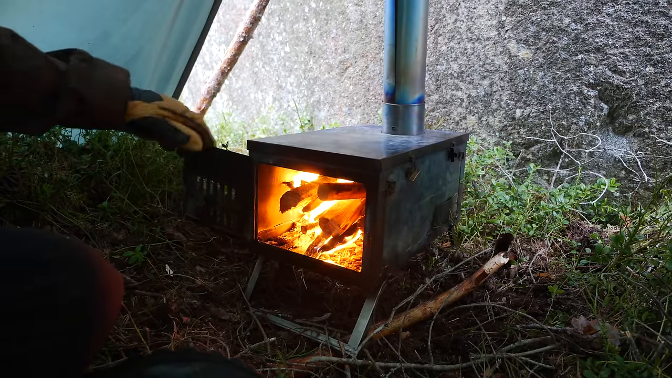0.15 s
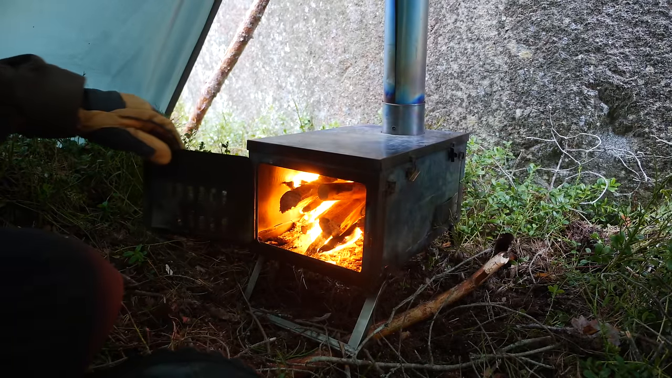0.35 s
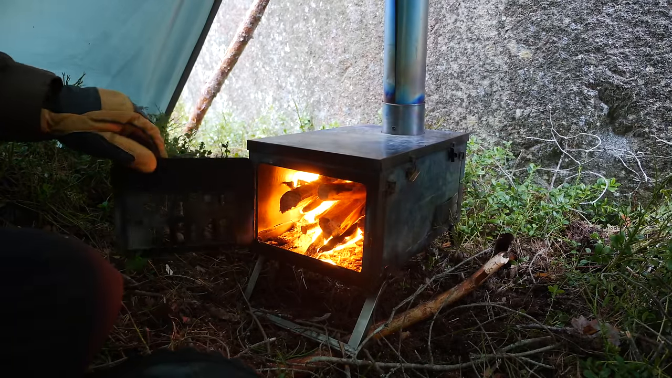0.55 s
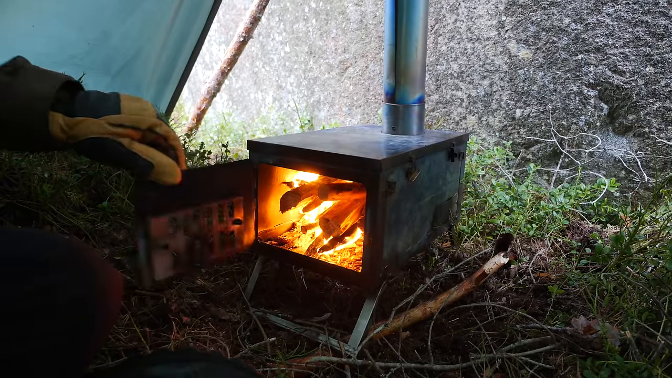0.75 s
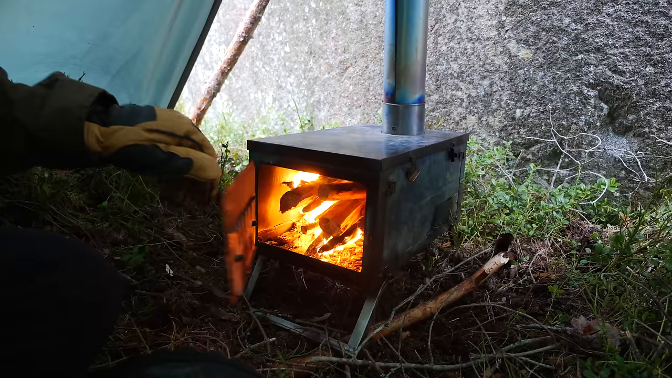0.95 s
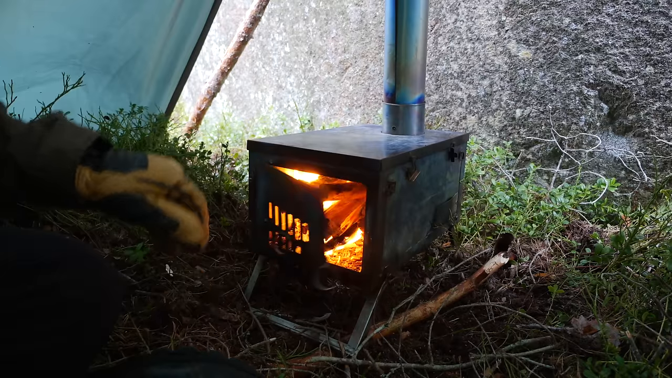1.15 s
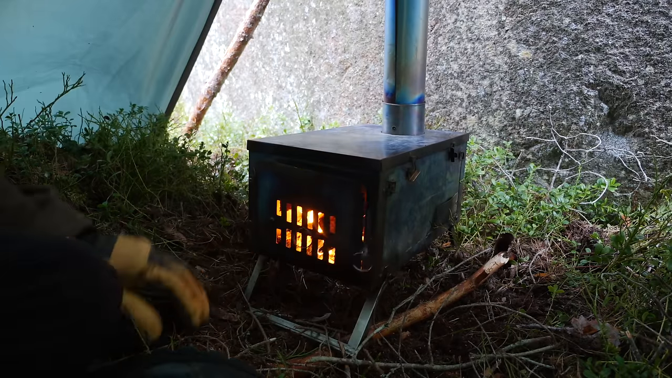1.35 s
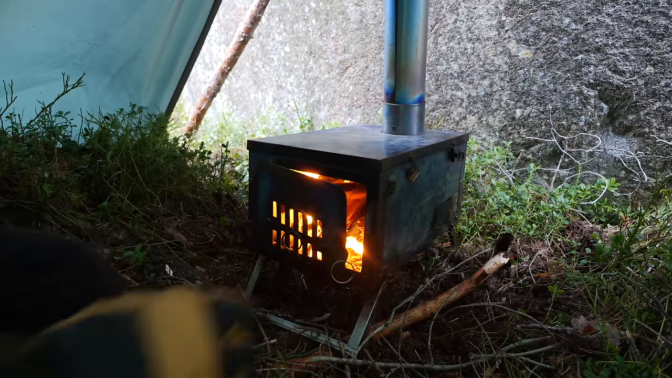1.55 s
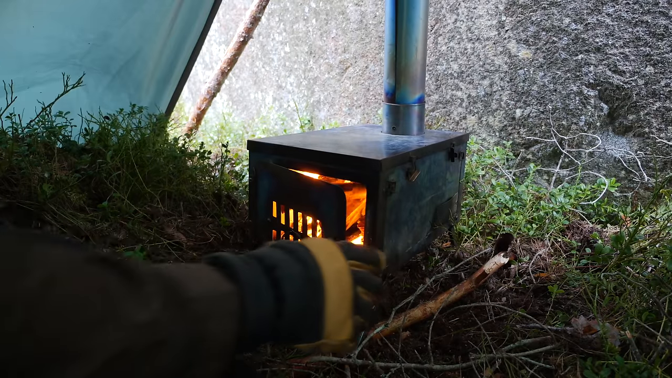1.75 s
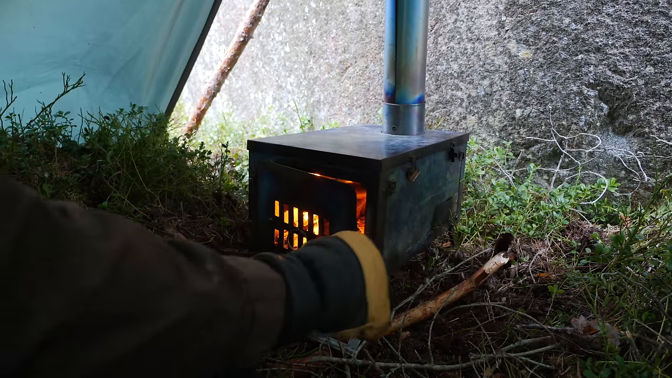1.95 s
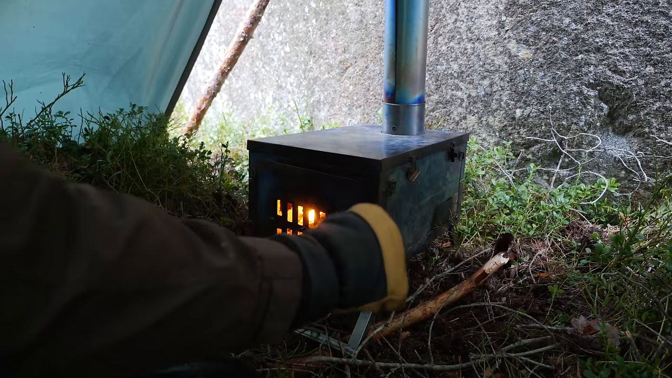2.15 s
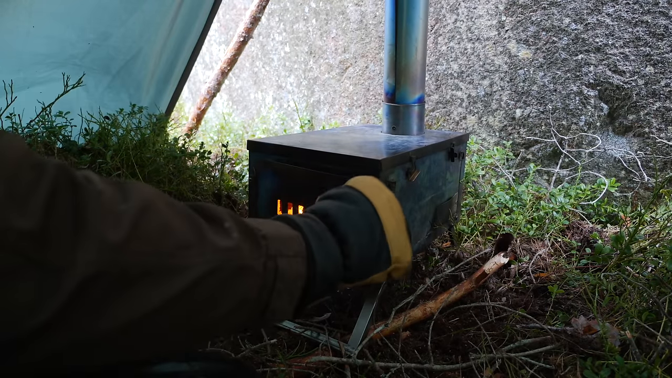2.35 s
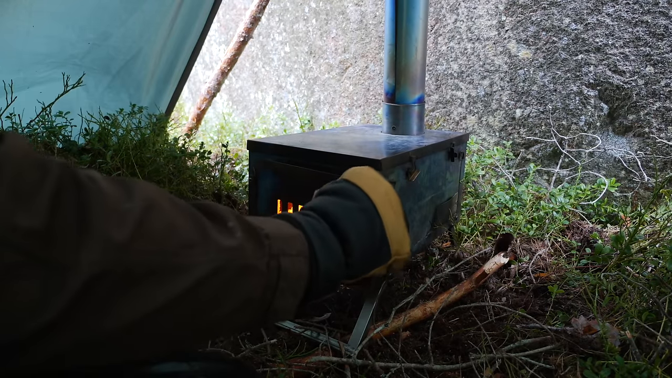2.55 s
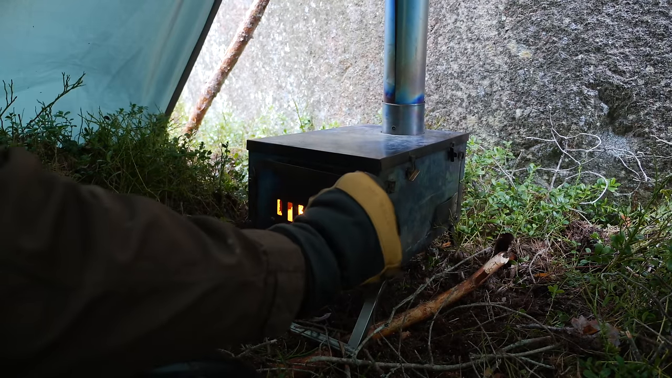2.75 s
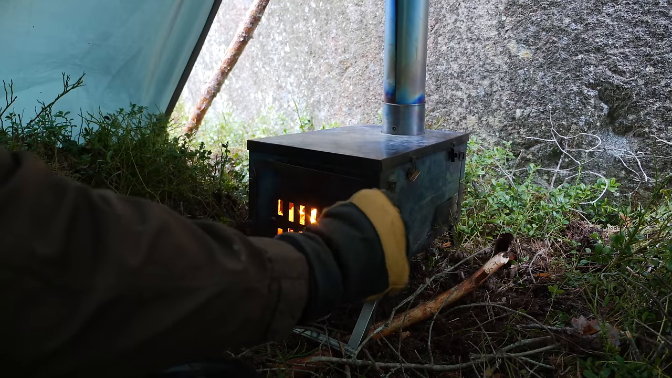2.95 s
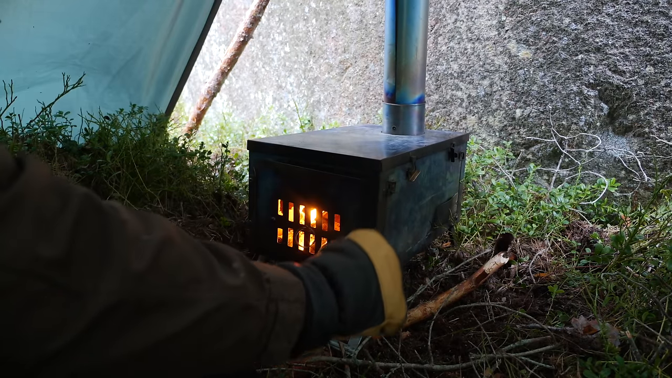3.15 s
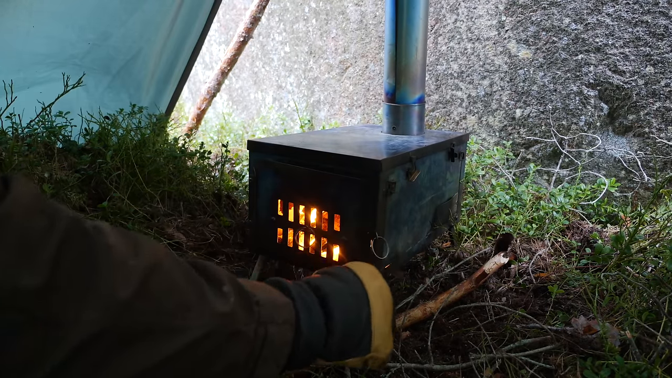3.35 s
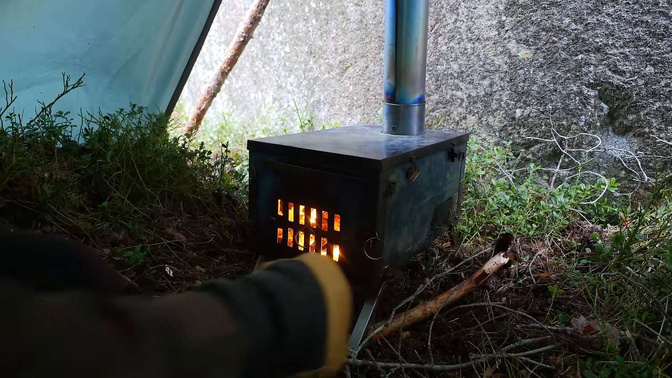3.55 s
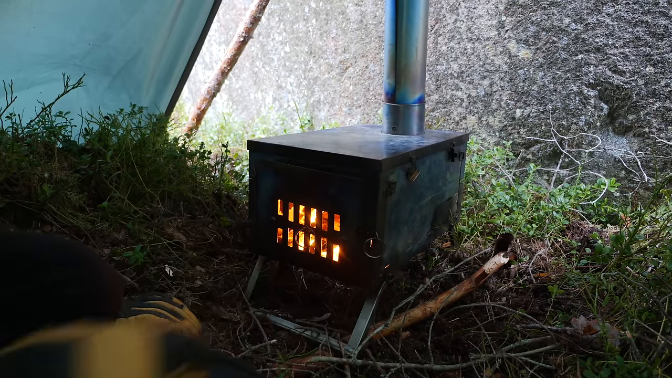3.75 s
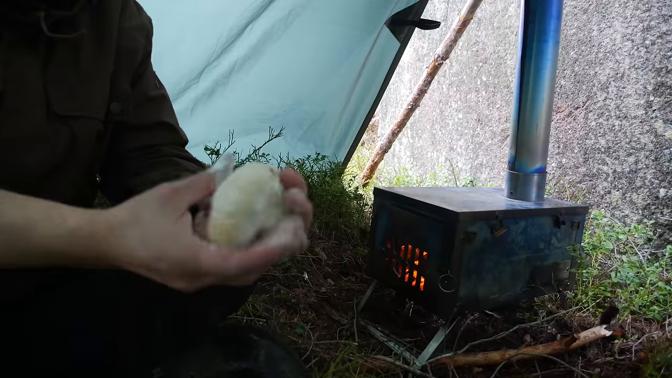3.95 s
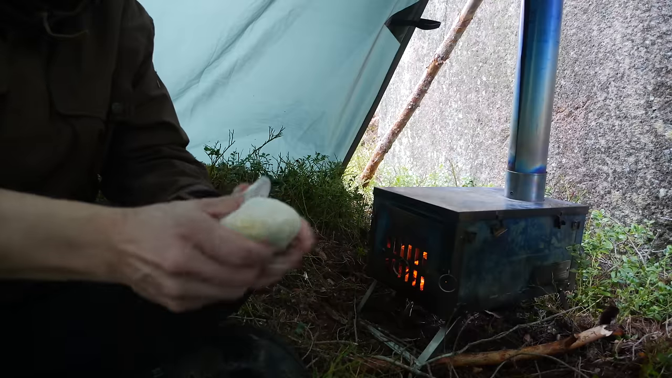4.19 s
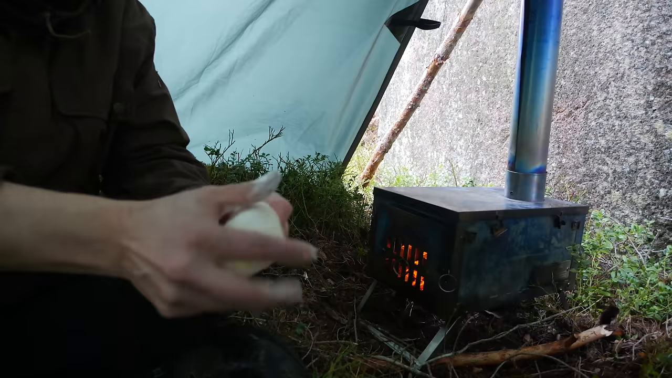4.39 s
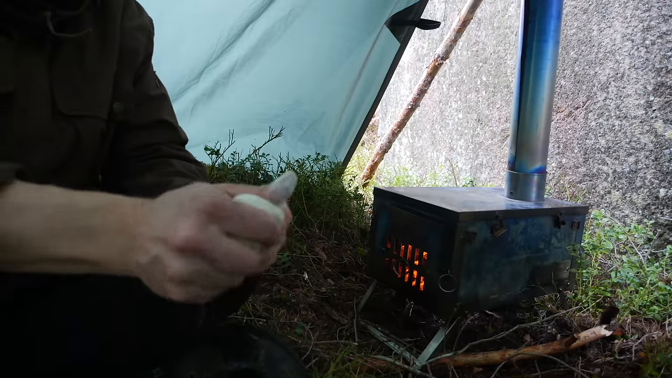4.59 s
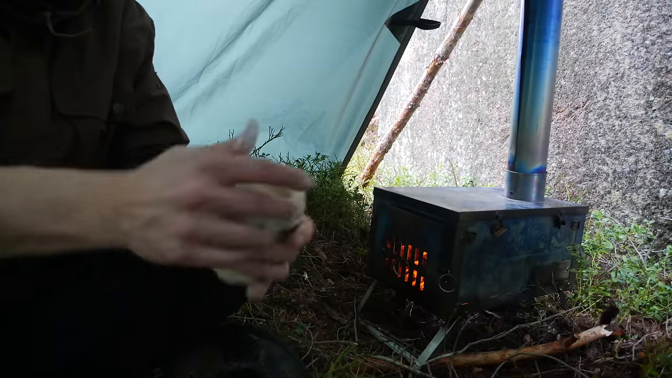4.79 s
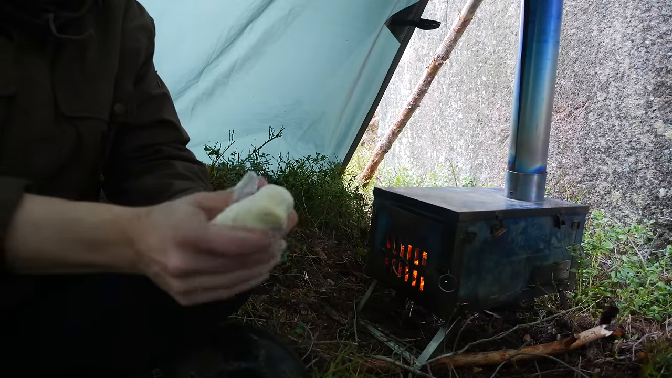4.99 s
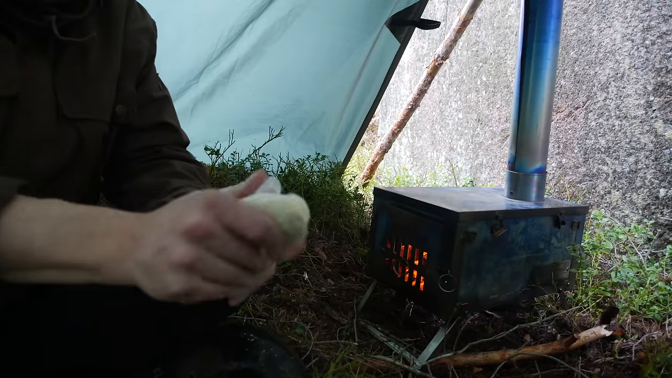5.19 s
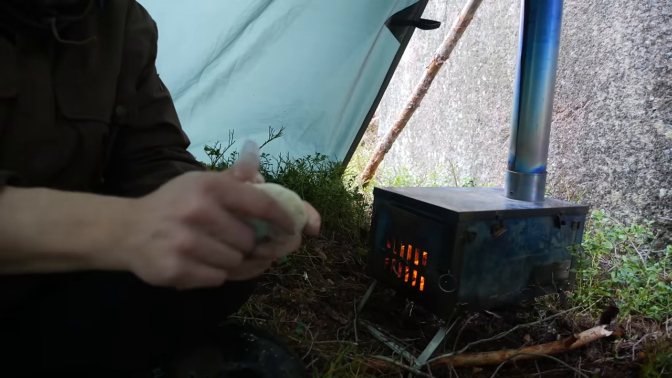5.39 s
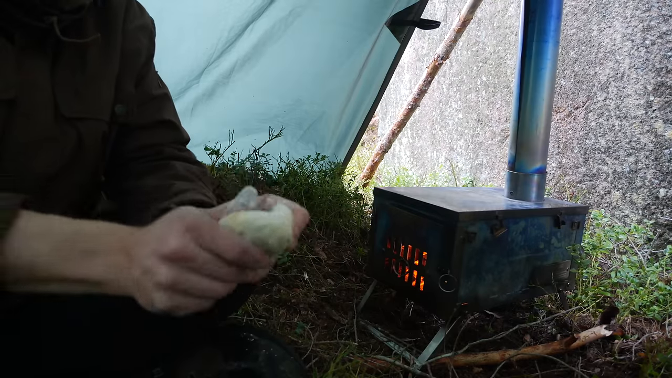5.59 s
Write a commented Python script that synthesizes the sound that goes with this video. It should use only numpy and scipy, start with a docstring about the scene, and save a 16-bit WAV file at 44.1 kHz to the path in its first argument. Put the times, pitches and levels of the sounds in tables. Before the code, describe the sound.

Thin sheet metal is handled first: small knocks, sleeve rustle, dragging hinge and tiny high squeaks. One hard, bright slam stands out far above the rest, ringing briefly. The latch then rattles, scrapes and knocks into place. After that only soft, uneven skin rubs on dough remain, with a faint fire and microphone hiss, close, mono and dry.

```python
"""Tent stove door, then dough

At a small tent stove a gloved hand swings the thin steel door shut and works its latch; later bare hands
knead dough. Blows ring decaying modes of sheet, door and latch; the drag is random slips waking modes, over
noise; rough single resonances are narrow noise; squeaks are wavering tones. Sleeve, hands and fire are coloured,
moving noise, snaps short noise bursts. One microphone in its housing, mono, with its own hiss, no room echo."""
import sys
import numpy as np
from scipy import signal
from scipy.fft import rfft, irfft
from scipy.io import wavfile
from scipy.ndimage import uniform_filter1d

SR = 44100
rng = np.random.default_rng(int(sys.argv[2]) if len(sys.argv) > 2 else 0)


def unload_wav(signal):
    """Save mono or channel-first audio to the path in sys.argv[1] as 16-bit WAV at rate SR, clipped to [-1, 1]."""
    wavfile.write(
        sys.argv[1],
        SR,
        np.round(np.clip(np.atleast_2d(signal).T, -1, 1) * 32767).astype(np.int16),
    )


def natural_amplitude(level_db):
    """Convert a level in decibels to a linear amplitude factor, elementwise."""
    exponent = np.asarray(level_db, float) / 20
    return 10 ** exponent


N = 248179  # samples

# clear modes of the door: f/Hz, relative level/dB, t60/s before damping
DOOR_MODES = [(163, -7, 0.28), (190, 0, 0.43), (355, -11.5, 0.23), (495, -13, 0.12), (657, -10, 0.18),
              (750, -7, 0.45), (847, -12, 0.3), (980, -20, 0.065), (1031, -16, 0.51), (1067, -18, 0.3),
              (1102, -28, 0.4), (1253, -14, 0.32), (1300, -0.5, 0.26), (1516, -2.5, 0.2),
              (2049, -13.5, 0.16), (2365, -30, 0.18), (2830, -8, 0.27), (3300, 0.5, 0.3), (3500, -9, 0.42),
              (3790, -2, 0.17), (4285, -10, 0.33), (6940, -16, .15), (8250, -5, 0.2)]
# clear modes of the latch bar: f/Hz, relative level/dB, t60/s before damping
LATCH_MODES = [(3600, -26, 0.081), (4710, 0.5, 0.059), (5080, 1.5, 0.046), (5390, -11, 0.25),
               (6700, 7.5, 0.038), (7560, -8, 0.29), (7270, 0, 0.11), (7240, -7, 0.18), (7860, 5, 0.065),
               (12400, -15, .1)]
# crowded modes of the sheet, heard as noise: f/Hz, relative level/dB, t60/s before damping, rise time constant/s
SHEET_BANDS = [(175, -1.5, 0.35, 0.043), (422, 3.5, 0.3, 0.0068), (1000, 4.5, 0.33, 0.0034),
               (1990, -4, 0.38, 0.002), (3880, -4.5, 0.36, 0.00099), (7500, 1, 0.19, 0.00069),
               (13000, -4.5, 0.22, 0.00088)]
# moves of the arm at the stove: peak t/s, rise/s, fall/s, rub of the sleeve level/dB, drag on the door level/dB
ARM_MOVES = [(.17, 0.022, 0.22, -56, -51.5), (.44, 0.025, 0.088, -49, -56),
             (.535, 0.067, 0.1, -40.5, -42.5), (.78, 0.12, 0.069, -59, -50.5),
             (.83, 0.036, 0.15, -48.5, -47.5), (1.146, 0.02, 0.023, -50, -46), (1.29, 0.013, .02, -54, -50),
             (1.23, 0.068, 0.31, -57, -48.5), (1.475, .03, 0.036, -47, -39.5),
             (1.62, 0.16, 0.14, -43.5, -45), (1.77, 0.13, 0.11, -42.5, -44),
             (2.184, 0.023, 0.018, -50.5, -56), (2.27, 0.08, 0.13, -55.5, -45.5),
             (2.345, .06, 0.051, -52.5, -56), (2.42, 0.017, 0.044, -52, -48.5),
             (2.53, 0.048, 0.052, -56, -45), (2.8, 0.022, 0.022, -54, -45), (2.844, .02, 0.02, -49.5, -62),
             (2.96, 0.076, .08, -72, -48.5), (3.088, 0.018, .05, -55, -50), (3.2, 0.043, 0.034, -52, -40),
             (3.29, 0.049, 0.043, -62, -45.5), (3.62, 0.14, 0.58, -51.5, -47), (3.9, 0.32, .2, -50.5, -53)]


def evened(x):
    """Scales to rms 1."""
    return x / np.sqrt(np.mean(x ** 2) + 1e-20)


def smooth_noise(shape, size):
    """Slowly wandering noise of rms 1 along the last axis."""
    return evened(uniform_filter1d(rng.standard_normal(shape), size=size))


def read(points, hz):
    """Reads a spectrum table, straight on a log-frequency axis."""
    f, value = np.transpose(points)
    return np.interp(np.log(hz + 1), np.log(f + 1), value)


def add(mix, s, sound):
    """Mixes a sound in at a time in seconds, in place."""
    part = mix[round(s * SR):][:len(sound)]
    part += sound[:len(part)]


def coloured(x, db):
    """Applies a gain in dB given over the FFT bins, then scales to rms 1."""
    return evened(irfft(rfft(x) * natural_amplitude(db), N))


def noise(points, patchy_db, flicker_db, grain_db):
    """Coloured noise of rms 1 with patches in time and pitch, broad flicker and single fibres catching."""
    catches = np.minimum(rng.exponential(1, N // 16 + 1), 3.5)
    grains = rng.standard_normal(N) * natural_amplitude(grain_db * np.repeat(catches, 16)[:N])
    hz, t, z = signal.stft(grains, SR, nperseg=256)
    field = uniform_filter1d(rng.standard_normal(z.shape), size=5, axis=0)
    patches = evened(uniform_filter1d(field, size=14, axis=1))
    flicker = smooth_noise(len(t), 4)
    moving = z * natural_amplitude(patchy_db * patches + flicker_db * flicker)
    rough = signal.istft(moving, nperseg=256)[1][:N]
    return coloured(rough, read(points, np.fft.rfftfreq(N, 1 / SR)))


def moves(rows, column, rest_db):
    """Gain over time: every move swells and dies by the same law, over a resting level."""
    edge_db = -9.5  # level at the end of the rise or fall, relative to the peak
    pointed = 1.16  # exponent: 1 is peaked, 2 is round
    t = np.arange(0, N, 32) / SR
    power = natural_amplitude(2 * rest_db)
    for row in rows:
        peak_s, rise_s, fall_s = row[:3]
        away = abs(t - peak_s) / np.where(t < peak_s, rise_s, fall_s)
        power = power + natural_amplitude(2 * (row[column] + edge_db * np.minimum(away, 10) ** pointed))
    return np.interp(np.arange(N) / SR, t, np.sqrt(power))


def hiss():
    """Steady hiss of the microphone, a coloured noise with a slight flicker."""
    # hiss spectrum: f/Hz, relative level per Hz/dB
    hiss_spectrum = [(120, -15), (200, -5), (743, 1.5), (2030, -9.5), (5320, -11.5), (6160, -15.5),
                     (8390, -12.5), (15600, -20.5)]
    return natural_amplitude(-59.0) * noise(hiss_spectrum, patchy_db=-2.44, flicker_db=1.5, grain_db=1.5)


def fire():
    """Low rumble of the fire: bass noise that swells and sinks with the draught."""
    # rumble spectrum: f/Hz, relative level per Hz/dB
    rumble = [(15, -32), (25, -3.5), (59, -1), (130, 0), (163, -4), (377, -7.5), (600, -58), (780, -49),
              (1320, -120)]
    # draught of the fire: t/s, level/dB
    draught = [(0.0, -56.5), (0.48, -61), (0.66, -60), (1.1, -61.5), (1.55, -53.5), (1.82, -62),
               (2.13, -59.5), (2.38, -53), (2.84, -58), (3.1, -49), (3.42, -61), (3.82, -54), (4.14, -62),
               (5.25, -59), (5.63, -62.5)]
    t, db = np.transpose(draught)
    gain = natural_amplitude(np.interp(np.arange(N) / SR, t, db))
    return noise(rumble, patchy_db=.8, flicker_db=.8, grain_db=.1) * gain


def bumps():
    """Soft bumps felt low: three slow cycles, most of the swing in the first."""
    # bumps: t/s, relative level/dB, f/Hz
    low_bumps = [(0.527, -35, 125), (2.203, -33.5, 125), (2.823, -38, 124), (3.366, -36, 126),
                 (3.524, -33.5, 125)]
    out = np.zeros(N)
    for s, db, hz in low_bumps:
        cycles = np.arange(round(3 * SR / hz)) * hz / SR
        add(out, s, natural_amplitude(db + 1.5) * np.sin(2 * np.pi * cycles) * np.exp(-cycles / 0.61))
    return out


def snaps():
    """Burning wood and metal edges snap dryly: a brief band of noise, then a faint short tail."""
    # snaps: t/s, peak level/dB, centre f/Hz, spread as a factor each way (at least 1.05 is used)
    dry_snaps = [(.3074, -44, 14000, 1.2), (0.5297, -23, 3450, 1.14), (0.5694, -19.5, 8000, 3.5),
                 (1.1014, -40, 9000, 3), (1.1445, -30.5, 2800, 3.3), (1.148, -33.5, 3300, 1.09),
                 (1.1817, -39, 3500, 1.4), (1.2043, -37, 5000, 1.6), (1.2255, -37, 2000, 2.5),
                 (1.2355, -29.5, 2870, 2), (1.3645, -3.5, 9600, 1.45), (2.181, -26.5, 8200, 1.1),
                 (2.7796, -33, 2530, 1.6), (3.372, -48, 13000, 1.2), (3.398, -49, 6000, 2.2),
                 (3.9868, -27, 10900, 1.5), (4.664, -48, 5400, 1.1), (4.7032, -46, 7800, 1.5),
                 (4.81, -45, 3600, 1.03)]
    t, out = np.arange(1500) / SR, np.zeros(N)
    for s, db, hz, spread in dry_snaps:
        spread = max(spread, 1.05)
        decay = natural_amplitude(-60 * t / 0.0041) + natural_amplitude(-16 - 60 * t / 0.022)
        edges = [hz / spread, min(hz * spread, .4 * SR)]
        band = signal.butter(2, edges, "bandpass", fs=SR, output="sos")
        burst = signal.sosfilt(band, rng.standard_normal(len(t)) * decay)
        add(out, s, natural_amplitude(db) * burst / abs(burst).max())
    return out


def hands():
    """Bare skin rubs on dough: coloured noise that swells with every squeeze."""
    # rub of skin on dough: f/Hz, relative level per Hz/dB
    skin = [(180, -21), (300, -0.5), (652, -8.5), (893, -7.5), (1850, -7.5), (2250, -8), (8460, -5),
            (15600, -15)]
    # squeezes of the dough: peak t/s, rise/s, fall/s, level/dB
    squeezes = [(3.984, 0.035, .1, -50), (4.13, .02, 0.068, -55), (4.2, .02, 0.066, -59.5),
                (4.33, 0.064, 0.055, -56), (4.44, 0.046, 0.018, -47), (4.485, .02, .05, -54.5),
                (4.61, 0.094, .03, -56), (4.67, .02, 0.014, -54.5), (4.71, 0.016, 0.015, -53),
                (4.804, 0.047, 0.062, -50.5), (4.93, 0.028, 0.096, -51), (5.06, 0.086, 0.05, -52),
                (5.145, 0.037, 0.017, -57), (5.2, .03, .05, -56), (5.285, 0.076, 0.027, -48.5),
                (5.52, 0.085, 0.05, -50.5), (5.6, .02, .06, -54)]
    rub = noise(skin, patchy_db=1.5, flicker_db=0.0, grain_db=1.0)
    return rub * moves(squeezes, column=3, rest_db=-74.5)


def sleeve():
    """The jacket rustles: coloured noise that swells with every move of the arm."""
    # rub of cloth: f/Hz, relative level per Hz/dB
    cloth = [(180, -8), (300, -12), (733, -7.5), (954, -16), (1130, -5.5), (1880, -8.5), (8190, -9.5),
             (15600, -24)]
    rustle = noise(cloth, patchy_db=2.5, flicker_db=0.5, grain_db=0.5)
    return rustle * moves(ARM_MOVES, column=3, rest_db=-65.5)


def squeaks():
    """Short stick-slips at a high, wavering pitch with its octave."""
    # squeaks of hinge pin and latch, later of skin on dough:
    # t/s, length/s, f/Hz, relative level/dB, octave level under the tone/dB
    chirps = [(0.917, .04, 6700, -47.5, -10), (.957, 0.029, 8160, -47, -30),
              (0.968, 0.045, 7340, -47.5, -30), (5.264, 0.039, 2210, -58, -30),
              (4.936, 0.052, 4300, -65, -30), (5.003, 0.094, 3960, -62, -30)]
    out = np.zeros(N)
    for s, length, hz, db, octave_db in chirps:
        u = np.linspace(0, 1, round(length * SR))
        pitch_waver, level_waver = smooth_noise((2, len(u)), 45)
        phase = 2 * np.pi * np.cumsum(hz * (1 + .015 * pitch_waver)) / SR
        shape = np.minimum(u / .08, 1) * (1 - u) ** 1.5 * natural_amplitude(3.8 * level_waver)
        octave = natural_amplitude(octave_db) * (2 * hz < .4 * SR) * np.sin(2 * phase)
        add(out, s, natural_amplitude(db + 5.0) * shape * (np.sin(phase) + octave))
    return out


def rough_resonances():
    """Door and latch, after blows or from the dragging hinge: a band that starts fast, breaks up and fades."""
    # rough single resonances: t/s, length/s, f/Hz, level at the start/dB
    resonances = [(.17, 0.19, 190, -50.5), (0.419, 0.082, 3660, -48), (.43, 0.088, 3180, -44),
                  (.55, 0.14, 190, -49.5), (0.722, 0.61, 355, -55), (0.733, 0.071, 1300, -48),
                  (0.857, 0.12, 1031, -47), (1.224, 0.033, 1000, -44.5), (1.245, 0.072, 780, -46),
                  (1.375, 0.088, 190, -44), (1.378, 0.072, 160, -41.5), (1.45, 0.12, 482, -45),
                  (1.447, 0.061, 1031, -39), (1.46, 0.073, 750, -39), (1.582, 0.058, 1300, -41.5),
                  (2.236, .13, 355, -46.5), (2.332, 0.046, 3300, -49), (2.369, 0.15, 355, -52),
                  (2.45, 0.25, 190, -57), (3.1, 0.15, 163, -48), (3.196, 0.24, 355, -51.5),
                  (3.355, .04, 2830, -61), (3.489, 0.043, 5390, -42), (3.568, 0.071, 1300, -48)]
    settle = 2000  # samples for the resonance to build up, then cut off
    out = np.zeros(N)
    for s, length, hz, db in resonances:
        u = np.linspace(0, 1, round(length * SR))
        r = np.exp(-np.pi * (12 + .045 * hz) / SR)  # higher resonances are wider
        real, imaginary = rng.standard_normal((2, len(u) + settle))
        slow = signal.lfilter([1], [1, -r ** 3], real + 1j * imaginary)
        slow = signal.lfilter([1], [1, -r], slow)[settle:]
        slow += 250 / hz * abs(slow).mean()  # low modes hold steadier
        band = evened((slow * np.exp(2j * np.pi * hz * length * u)).real)
        shape = np.minimum(u / .12, 1) * np.minimum((1 - u) / 0.34, 1)
        add(out, s, natural_amplitude(db - 6. * u) * band * shape)
    return out


def drag():
    """Hinge and glove rasp on the sheet; uneven slips wake one mode, then another."""
    # rasp on the sheet: f/Hz, relative level per Hz/dB
    rasp = [(120, -22), (200, -3), (358, 1.5), (557, -2.5), (999, -1), (3210, -9), (6000, -15), (7800, -44),
            (13200, -120)]
    slip_rate = 500.  # mean slips per second
    strength = natural_amplitude(3.9 * np.minimum(rng.exponential(1, N), 2.5))
    slips = (rng.random(N) < slip_rate / SR) * strength * rng.choice([-1, 1], N)
    t, modes = np.arange(SR // 5) / SR, np.zeros(N)
    for hz, _, t60 in DOOR_MODES[3:21] + LATCH_MODES[:4]:
        wander = uniform_filter1d(rng.standard_normal(N), size=2500)
        wander = evened(uniform_filter1d(wander, size=2500))  # the grip moves
        mode = natural_amplitude(-60 * 1.1 * t / t60 - 1.4 * np.log2(hz / 500)) * np.sin(2 * np.pi * hz * t)
        modes += signal.oaconvolve(slips * natural_amplitude(2.7 * np.clip(wander, -2, 2)), mode)[:N]
    shake = natural_amplitude(-9.0) * evened(modes) + noise(rasp, patchy_db=2.1, flicker_db=1.43, grain_db=3.0)
    return evened(shake) * moves(ARM_MOVES, column=4, rest_db=-59.5)


def slope(tilt_db, hz):
    """Tilts the treble about 5 kHz, up for a hard blow and down for a soft one; level below 1.5 kHz."""
    return tilt_db * np.log2(np.maximum(hz, 1500) / 5000)


def ring(modes, t, damping, tilt_db):
    """Clear modes struck at a chance place; bass blooms later than treble."""
    hz, db, t60 = np.transpose(modes)[:, :, None]
    place_db = 2.5 * rng.standard_normal(hz.shape)
    phase = 2 * np.pi * rng.random(hz.shape)
    rise = np.exp(read([(f, np.log(rise)) for f, _, _, rise in SHEET_BANDS], hz))
    bloom = 1 - np.exp(-t / rise)
    level = natural_amplitude(db + place_db + slope(tilt_db, hz) - 60 * damping * t / t60)
    return (level * bloom * np.sin(2 * np.pi * hz * t + phase)).sum(0)


def sheet_noise():
    """Overlapping bands of noise whose fine peaks stand for sheet modes too close to count."""
    bins = np.fft.rfftfreq(N, 1 / SR)
    centres = [row[0] for row in SHEET_BANDS]
    peaks = natural_amplitude(3 * smooth_noise(len(bins), 220))
    bands = []
    for one in np.eye(len(SHEET_BANDS)):
        share = read(list(zip(centres, one)), bins) * (bins > 100)
        bands.append(evened(irfft(rfft(rng.standard_normal(N)) * peaks * np.sqrt(share), N)))
    return np.array(bands)


def knock(tilt_db, damping, door_db, latch_db, sheet):
    """One blow: a crack, the crowded modes of the sheet, the clear modes of door and latch."""
    t = np.arange(SR // 2) / SR
    hz, db, t60, rise = np.transpose(SHEET_BANDS)[:, :, None]
    start = rng.integers(N - len(t))
    crack = natural_amplitude(1.0 + 0.51 * tilt_db - 60 * t / 0.0068) * (hz > 1500)  # first contact, sharper when hard
    shape = natural_amplitude(-60 * damping * t / t60) * (1 - np.exp(-t / rise)) + crack
    level_db = db + slope(tilt_db, hz) + door_db * (hz < 1400)  # the bass needs the whole door to swing
    crowded = (natural_amplitude(level_db) * shape * sheet[:, start:start + len(t)]).sum(0)
    door_ring = natural_amplitude(door_db) * ring(DOOR_MODES, t, damping, tilt_db)
    latch_ring = natural_amplitude(latch_db) * ring(LATCH_MODES, t, 0.93, 0)
    return natural_amplitude(-17.5) * (crowded + door_ring + latch_ring)


def door():
    """All blows on door and latch; sharp blows die faster, strong ones slower."""
    # blows: t/s, relative level/dB, tilt/dB per octave, door swing relative level/dB, latch ring relative level/dB
    blows = [(.158, -26, -1, -7.5, -12), (0.1991, -25.5, 1.5, -5, -24), (0.375, -31.5, -6, -28, -14),
             (0.4117, -31.5, -2.5, -27, -5), (0.5077, -25, -7, -21.5, -14), (0.53, -23, -2.5, -11, -11),
             (0.6661, -32, -3.5, -9.5, -16), (0.722, -33, -5.5, -14, -22), (0.7994, -30.5, 1, -12, -8),
             (0.864, -33, -6.5, -13.5, -17), (1.363, -6.5, 3, -10, -5), (1.366, -10.5, -2, -13, -14),
             (1.376, -11.5, -2.5, -6.5, -17), (1.3886, -10, -0.5, -7.5, -15), (1.4068, -14, 5.5, -12, -17),
             (1.427, -19.5, 1, -4, -16), (1.4589, -24, 2.5, -8, -10), (1.488, -36.5, -6.5, 1, -20),
             (1.946, -21.5, 2, -7.5, -5), (1.9706, -28, -2, -9, -13), (2.0136, -31.5, -1, -8, 1),
             (2.0225, -27.5, 0.5, -13, -3), (2.038, -27.5, 3.5, -11, -10), (2.237, -26, -1.5, -12.5, -4),
             (2.4835, -34.5, -4, -8, -10), (2.5181, -27.5, -2, -6, -20), (2.7793, -35, -5, -8.5, -18),
             (2.8768, -36.5, -4, -7.5, -14), (2.8946, -21, -2, -9, -22), (2.9191, -24, -1, -4.5, -23),
             (3.0787, -35.5, -5.5, -6.5, -18), (3.1328, -30, -3, -9.5, -25), (3.156, -14, 1, -10.5, -5),
             (3.1818, -13.5, -1.1, -12, -25), (3.238, -15, -0.5, -10.5, -14),
             (3.279, -32.5, -5.5, -11, -12), (3.4667, -14.5, 0.5, -10.5, -4),
             (3.5619, -22.5, 0.3, -7.5, -5)]
    sheet = sheet_noise()
    out = np.zeros(N)
    for s, db, tilt_db, door_db, latch_db in blows:
        damping = max(1.49 + 0.13 * tilt_db - 0.016 * db, .3)  # factor on the decay rate
        add(out, s, natural_amplitude(db) * knock(tilt_db, damping, door_db, latch_db, sheet))
    return out


def scene():
    """Fire and bumps behind; the arm at the stove door in front, then the hands in the dough."""
    arm = np.interp(np.arange(N) / SR, [3.95, 3.975], [1, 0])  # the arm rests, the hands start
    background = fire() + bumps() + snaps()
    rubbing = arm * (sleeve() + drag()) + (1 - arm) * hands()
    tones_and_blows = squeaks() + rough_resonances() + door()
    return (background + rubbing + tones_and_blows)[None]


def response_db(hz):
    """Frequency response of the microphone in its housing, with the band limits of the whole, in dB."""
    # dips and humps of the housing: f/Hz, width/Hz, level/dB
    humps = [(6000, 570, -2), (8180, 550, 1), (10360, 780, -3.5), (13160, 830, 4)]
    colour_db = sum(db * np.exp(-.5 * ((hz - f) / width) ** 2) for f, width, db in humps)
    colour_db += read([(10, -24), (45, 0.5)], hz)  # gentle lower band limit
    colour_db += read([(16200, 0), (16900, -70)], hz)  # steep upper band limit
    return colour_db


def top_cut(x):
    """Nothing passes above the cut-off."""
    return signal.sosfilt(signal.butter(12, 17010, fs=SR, output="sos"), x)


def record(dry):
    """Adds the microphone hiss, then the housing colour and the band limits."""
    wet = dry + hiss()
    hz = np.fft.rfftfreq(N, 1 / SR)
    mix = irfft(rfft(wet) * natural_amplitude(response_db(hz)), N)
    return top_cut(mix)


dry = scene()
out = record(dry)
unload_wav(out)
```